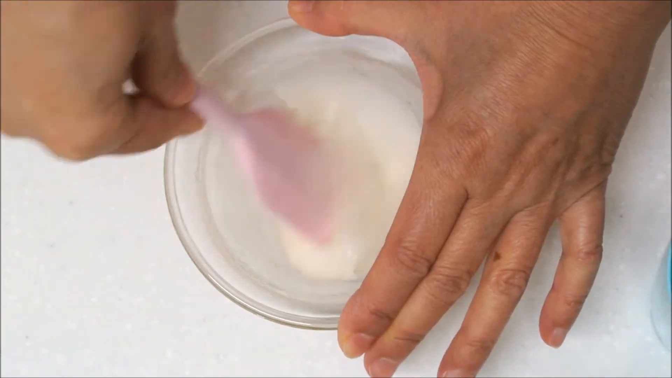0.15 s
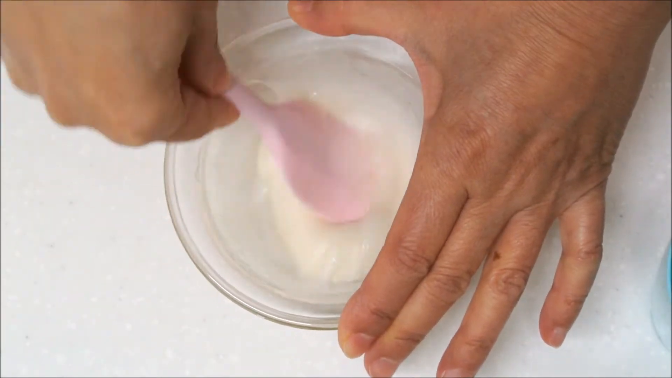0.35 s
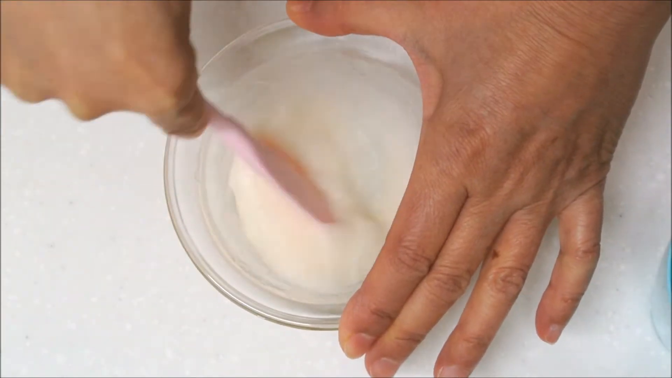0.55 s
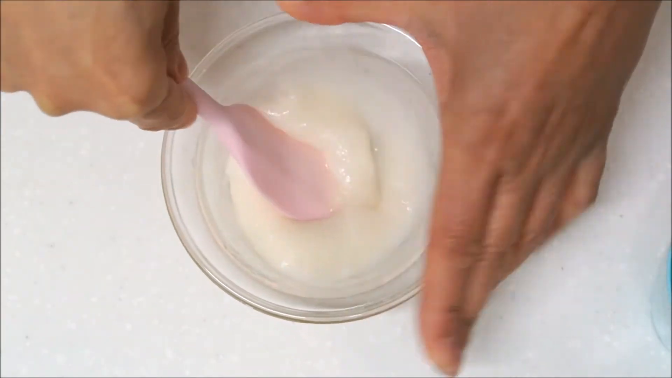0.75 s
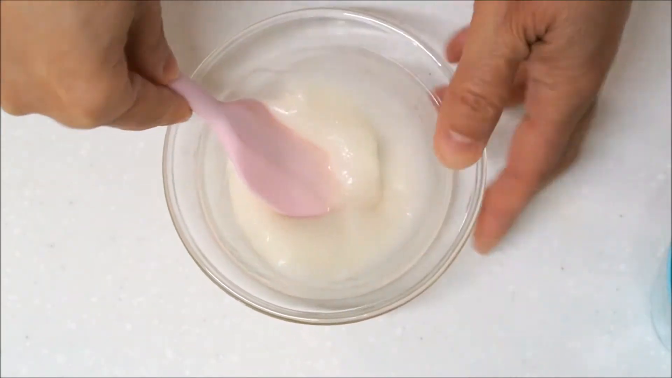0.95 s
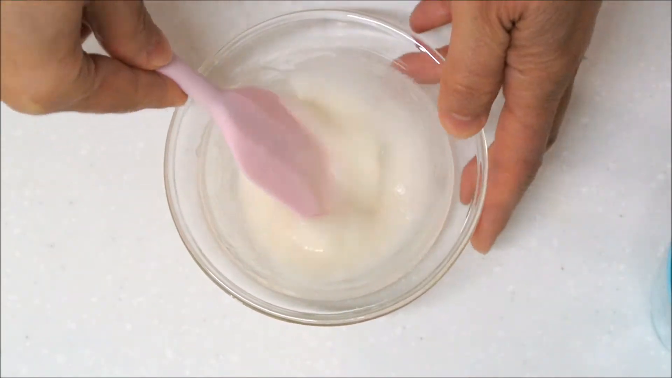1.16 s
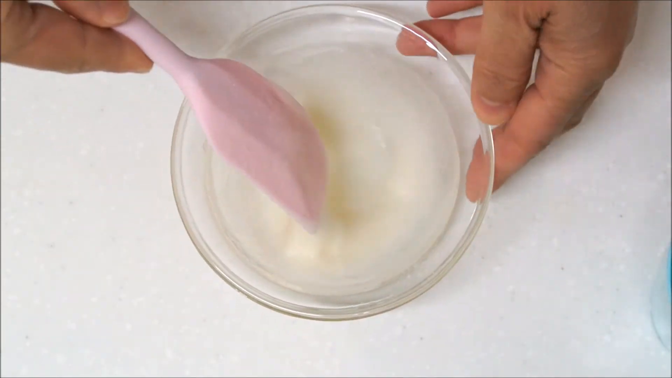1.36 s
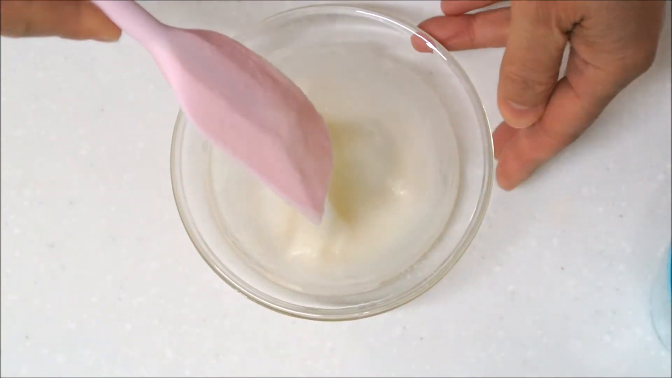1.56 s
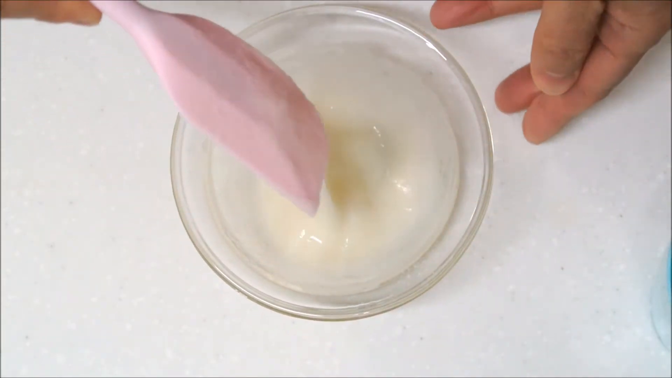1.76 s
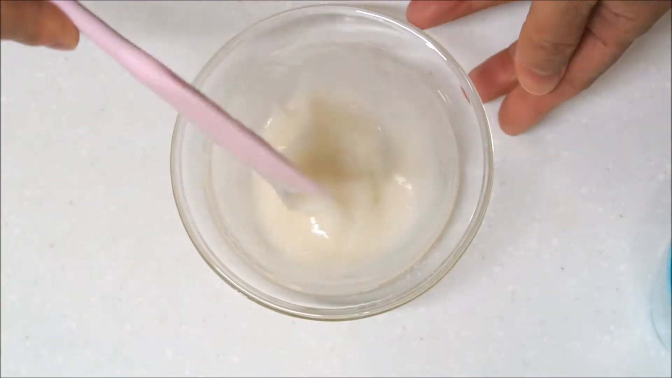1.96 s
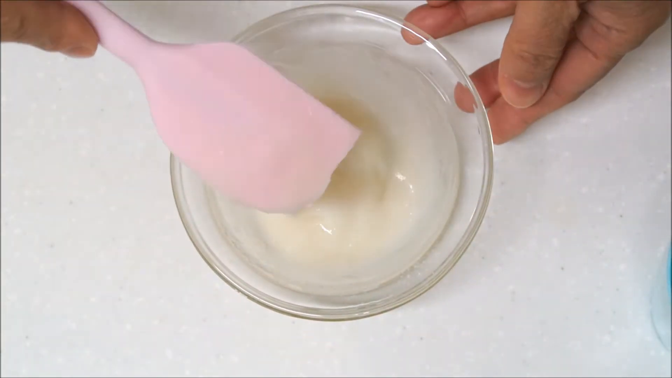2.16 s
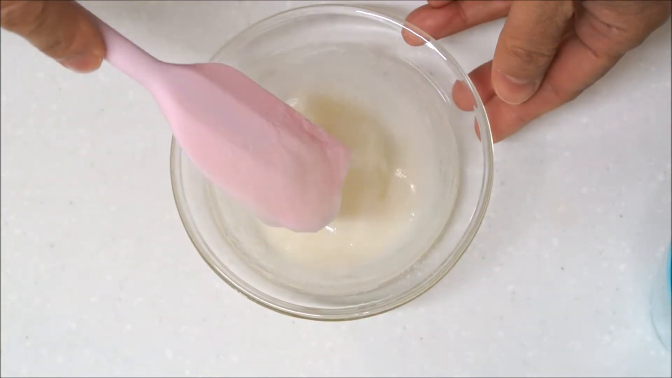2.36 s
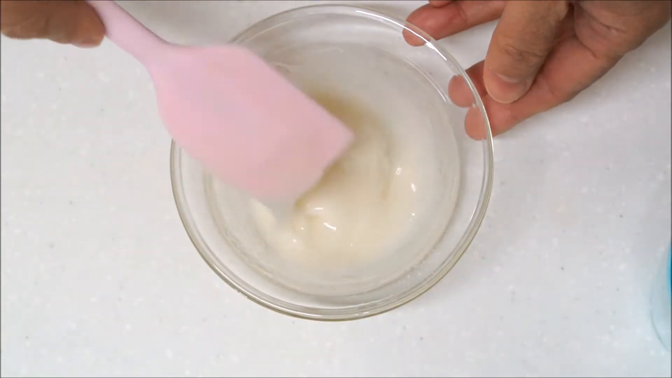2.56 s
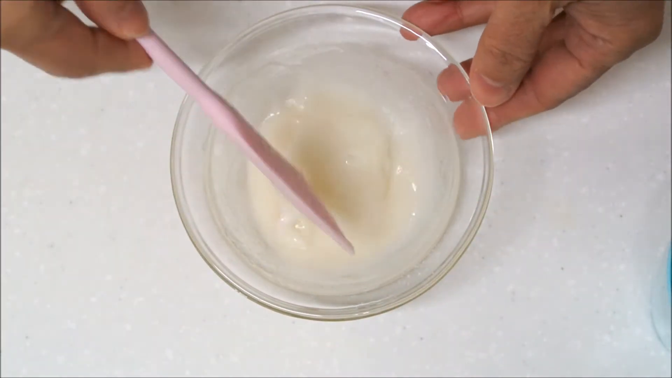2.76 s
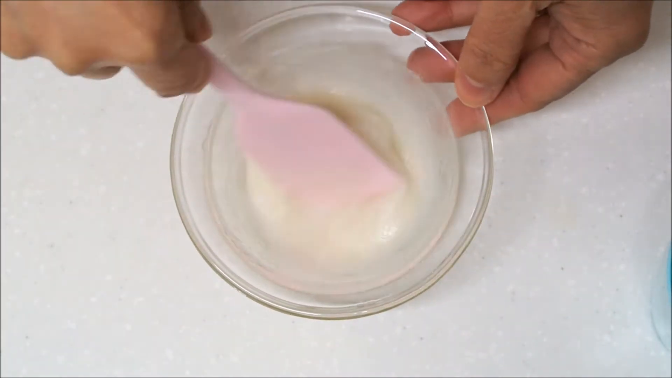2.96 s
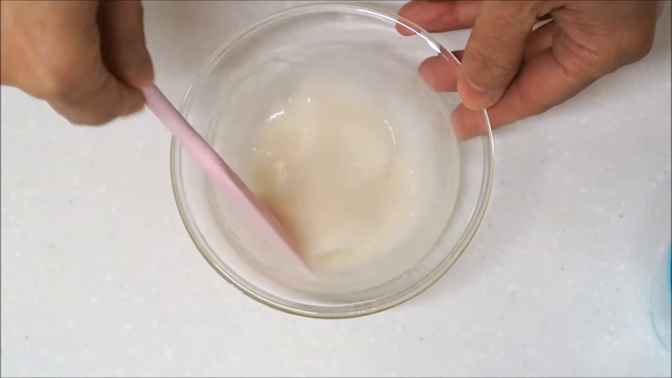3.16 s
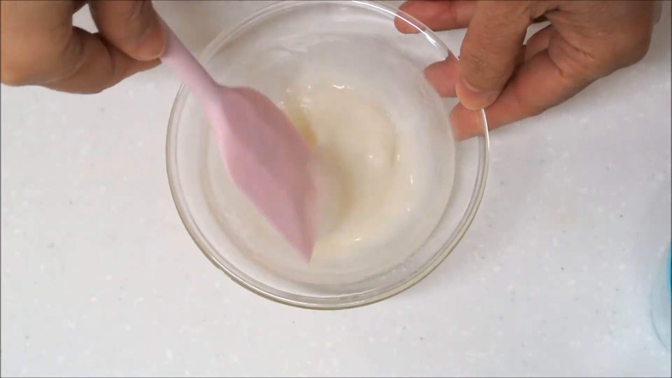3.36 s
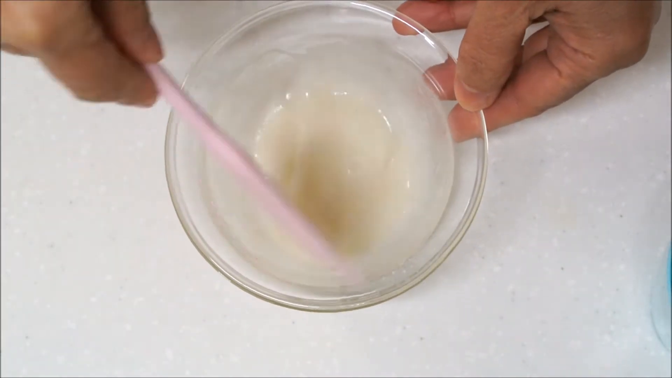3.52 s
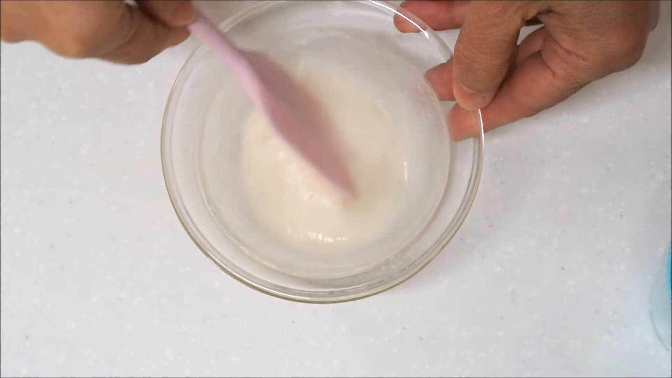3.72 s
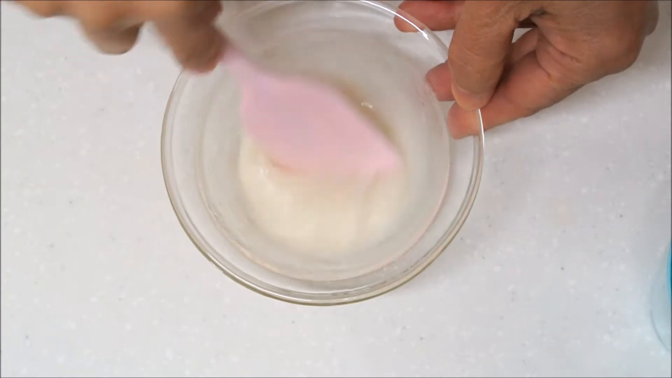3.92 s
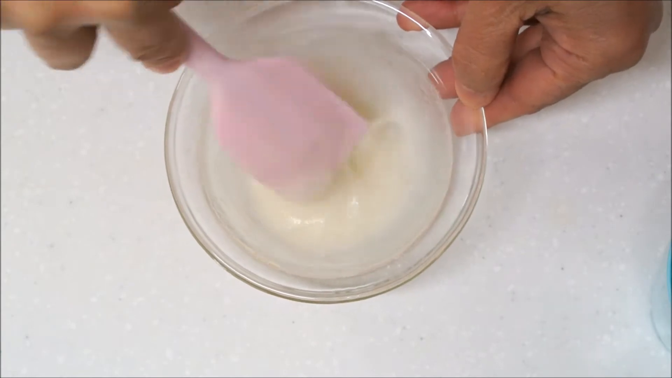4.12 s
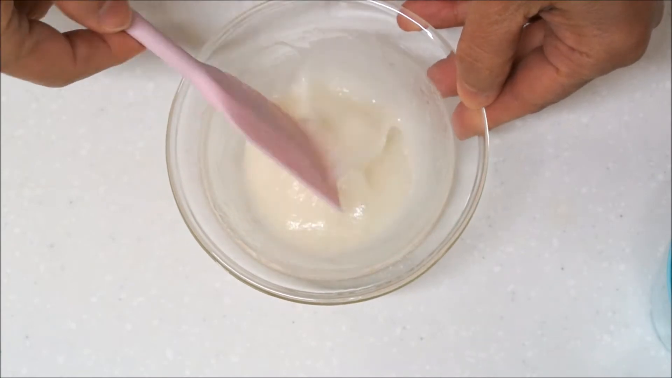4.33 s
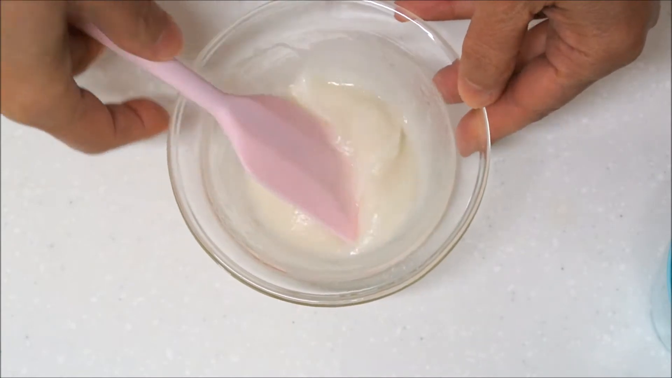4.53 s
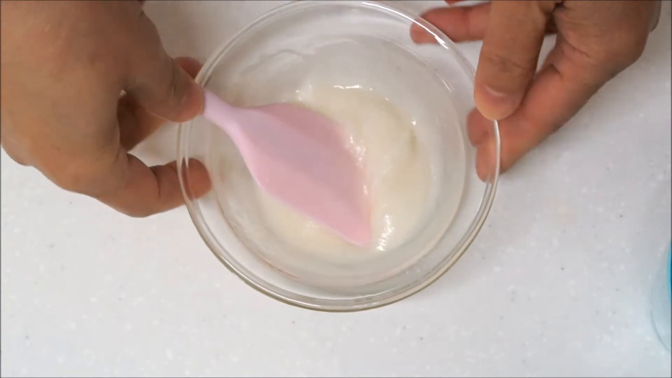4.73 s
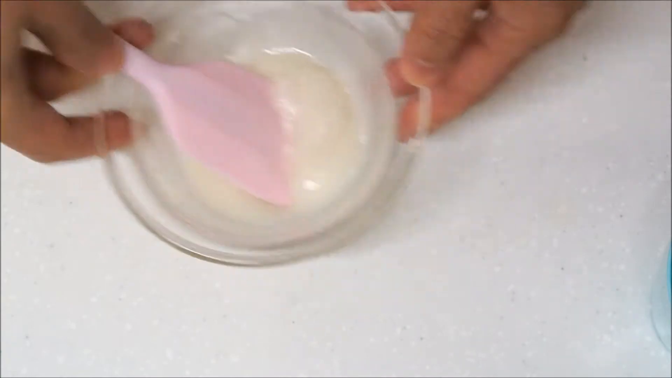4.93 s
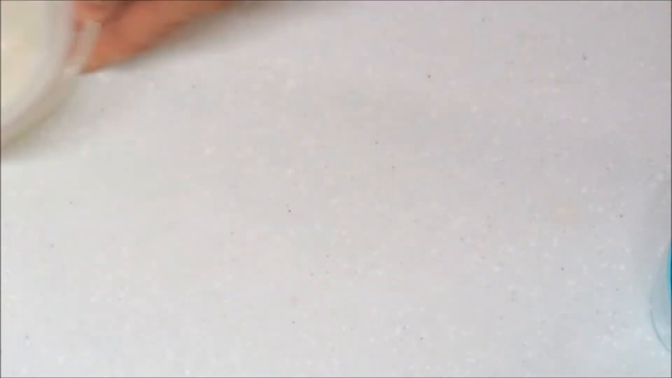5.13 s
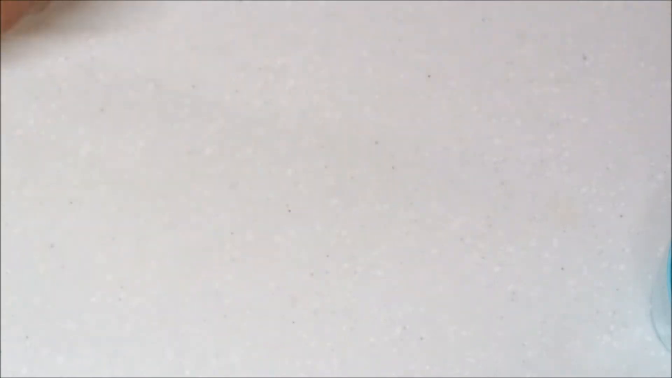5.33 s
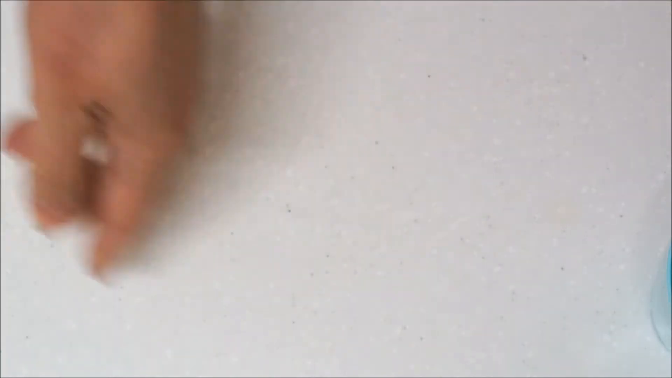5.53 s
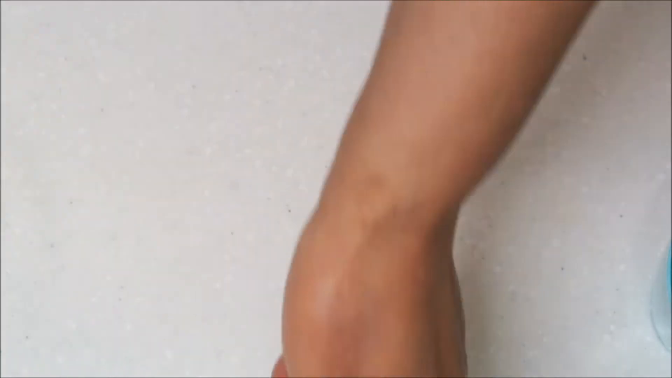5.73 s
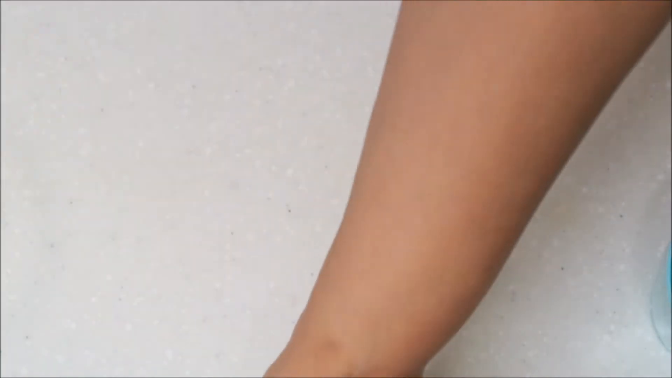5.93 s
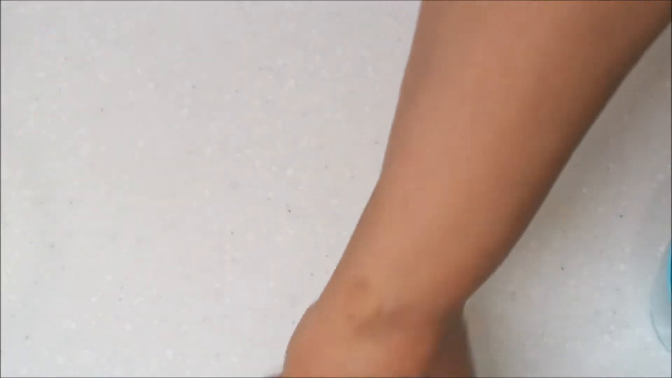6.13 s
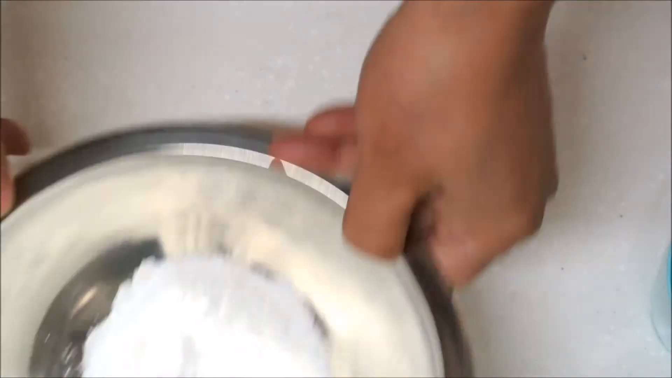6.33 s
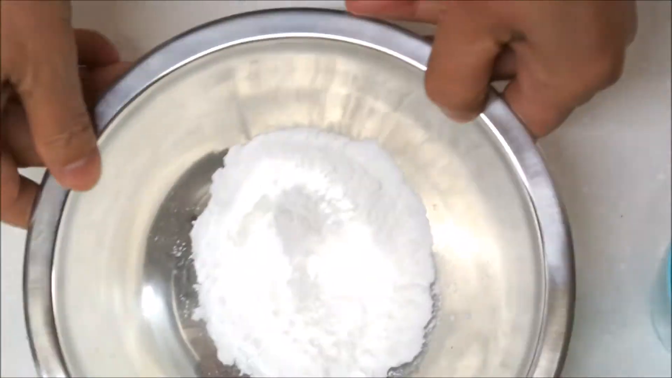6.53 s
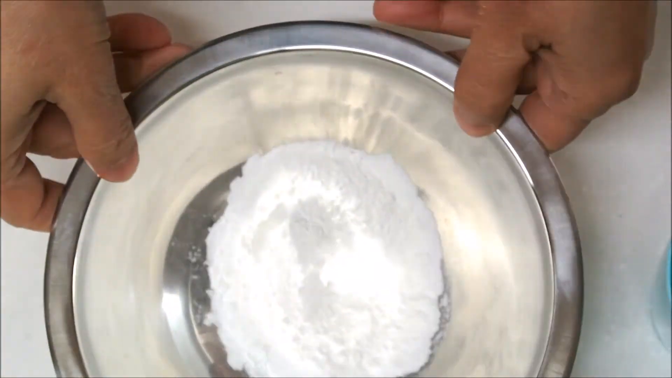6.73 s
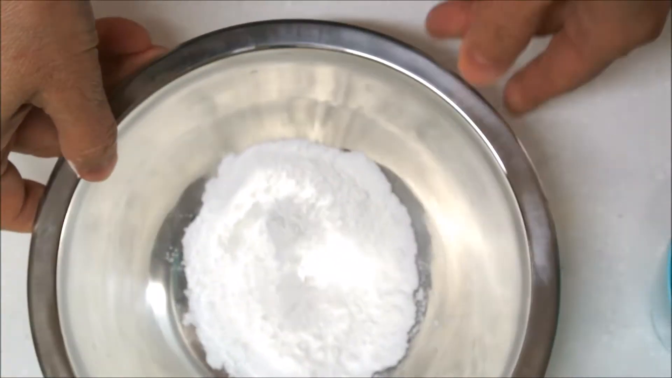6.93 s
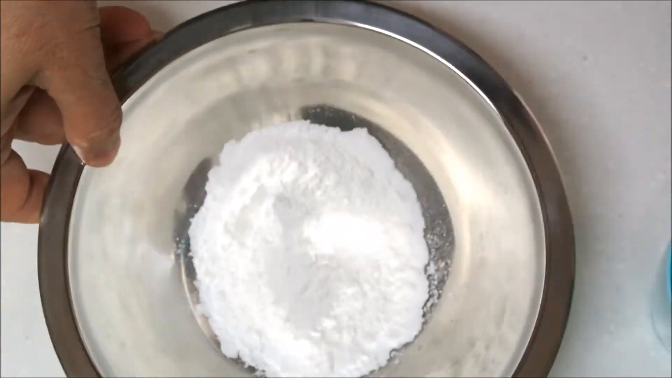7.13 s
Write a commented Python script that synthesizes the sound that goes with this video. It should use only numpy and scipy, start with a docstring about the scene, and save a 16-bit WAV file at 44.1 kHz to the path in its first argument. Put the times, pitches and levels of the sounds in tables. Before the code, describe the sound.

Close to the microphone in a small, slightly echoing kitchen, a soft spatula bumps and rubs inside a glass bowl while batter squelches faintly. The stirring comes in irregular spurts over a low fan hum. One hard knock follows as the glass is put on the counter. Then a steel bowl scrapes briefly across the surface and is set down with a ringing clank.

```python
"""A silicone spatula stirs thick batter in a glass bowl on a kitchen counter: the blade bumps the glass,
blade or fingers judder along it, and the batter squelches and ticks. The bowl is put down hard to
the left. A steel bowl of powder is gripped and slid over, rasping and squeaking, then set down ringing.
An appliance hums in the small live room, and the recorder's gain control ducks on the loud knocks."""
import sys
import numpy as np
from scipy import signal
from scipy.fft import rfft, irfft, next_fast_len
from scipy.io import wavfile
from scipy.ndimage import uniform_filter1d

SR = 44100
rng = np.random.default_rng(int(sys.argv[2]) if len(sys.argv) > 2 else 0)


def generate_wav(signal):
    """Clip the signal to [-1, 1] and save it as 16-bit WAV at the path in sys.argv[1]."""
    frames = np.transpose(np.atleast_2d(signal))
    scaled = np.clip(frames, -1, 1) * 32767
    pcm = np.round(scaled).astype(np.int16)
    wavfile.write(sys.argv[1], SR, pcm)


N = 316638
TIME = np.arange(N) / SR


def from_db(db):
    """Decibels to gain."""
    return 10 ** (np.asarray(db) / 20)


def rms_one(x):
    """Scale to rms 1."""
    return x / np.sqrt(np.mean(x ** 2) + 1e-20)


def at_hz(points, hz):
    """Read a curve on a log-frequency axis."""
    points = np.array(points)
    return np.interp(np.log(np.maximum(hz, 1)), np.log(points[:, 0]), points[:, 1])


def convolve(x, response):
    """Pass a sound through an impulse response."""
    return signal.oaconvolve(np.atleast_2d(x), np.atleast_2d(response), axes=-1)[:, :N]


def colour(x, spectrum, size=8192):
    """Minimum-phase EQ of unit energy: the curve sets the tone, not the overall level."""
    gains = from_db(at_hz(spectrum, np.fft.rfftfreq(size, 1 / SR)))
    cepstrum = irfft(np.log(gains))[:size // 2]
    cepstrum[0] /= 2
    response = irfft(np.exp(rfft(2 * cepstrum, size)))[:size // 2]
    return convolve(x, response / np.linalg.norm(response))


def resonance(x, hz, width):
    """Two-pole band-pass with gain 1 at its peak."""
    r = np.exp(-np.pi * width / SR)
    poles = [1, -2 * r * np.cos(2 * np.pi * hz / SR), r * r]
    return signal.lfilter(np.array([1, 0, -1]) * (1 - r * r) / 2, poles, x + 1e-18)


def steep_band(x, hz, width):
    """Two resonances in series, for steeper skirts."""
    return resonance(resonance(x, hz, width), hz, width)


def body(force, modes):
    """The force radiates directly as a thud and rings the modes."""
    ring = sum(from_db(db) * resonance(force, hz, np.log(1000) / np.pi / t60) for hz, db, t60 in modes)
    return force + ring


def dying(t, t60):
    """Gain that falls by 60 dB in t60 seconds."""
    return np.exp(-np.log(1000) * np.maximum(t, 0) / t60)


def blows(rows, size=2048):
    """Force pulses: the softer the contact, the lower its treble ends."""
    force = np.zeros(N + size)
    for start, db, hz in rows:
        at = round(start * SR)
        softness = signal.butter(2, min(hz, SR / 3), fs=SR, output="sos")
        force[at:at + size] += from_db(db) * signal.sosfilt(softness, signal.unit_impulse(size))
    return force[:N]


def stroke(start, rise, length, t60):
    """Pressure of one rub: it builds up, holds, then slips away; times in seconds."""
    return np.clip((TIME - start) / rise, 0, 1) * dying(TIME - start - max(length, rise), t60)


def grains(per_s, spread_db):
    """Random tiny slips of uneven size; rms 1."""
    sizes = from_db(spread_db * np.minimum(rng.exponential(1, N), 4)) * rng.choice([-1, 1], N)
    return rms_one(sizes * (rng.random(N) < per_s / SR))


# How alike diffuse sound is at the two microphones: frequency_hz, correlation
STEREO_LIKENESS = [(100, 0.78), (450, 0.85), (900, 0.62), (1500, 0.4), (2800, 0.044), (5000, 0)]

def diffuse(size):
    """White stereo noise from all sides: narrow in the bass, wide in the treble."""
    alike = np.clip(at_hz(STEREO_LIKENESS, np.fft.rfftfreq(size, 1 / SR)), -1, 1)
    mid, side = rfft(rng.standard_normal((2, size)))
    return irfft(np.sqrt((1 + alike) / 2) * mid + np.sqrt((1 - alike) / 2) * side * [[1], [-1]], size)


# Reverb time of the kitchen: frequency_hz, t60_s
ROOM_DECAY = [(120, 0.52), (400, 0.5), (1200, 0.46), (2800, 0.5), (5500, 0.42), (10000, 0.31),
              (15000, 0.098)]

def room_tail(size=32768, bands=12):
    """Reverb of unit energy; each band dies at its own rate."""
    t, hz = np.arange(size) / SR, np.fft.rfftfreq(size, 1 / SR)
    centres = np.geomspace(ROOM_DECAY[0][0], ROOM_DECAY[-1][0], bands)
    noise, tail = rfft(diffuse(size)), 0
    for centre, share in zip(centres, np.eye(bands)):
        band = irfft(noise * at_hz(np.c_[centres, share], hz))
        tail = tail + band * dying(t, at_hz(ROOM_DECAY, centre))
    return rms_one(tail * np.minimum(t / 0.0054, 1)) / np.sqrt(size)


def kitchen(x, near_db, room_db, lead_ms, near_t60=0.031, size=32768):
    """Direct sound (earlier on the left by lead_ms), reflections off counter and wall, then the room."""
    t = np.arange(size) / SR
    delay_samples = np.maximum([[-lead_ms], [lead_ms]], 0) * SR / 1000
    direct = np.sinc(np.arange(size) - delay_samples)
    near = rms_one(diffuse(size) * dying(t, near_t60) * np.minimum(t / 0.00037, 1)) / np.sqrt(size)
    return convolve(x, direct + from_db(near_db) * near + from_db(room_db) * room_tail())


# Wavering drone of the fan: pitch_hz, half_width_hz, level_db
FAN_BANDS = [(144, 17, -63.5), (252.2, 8.6, -57), (392.3, 14, -65), (514.7, 12, -65.5), (794, 35, -59.5),
             (872, 21, -62)]
# Steady hum of the motor: pitch_hz, level_db
MOTOR_TONES = [(48.5, -64), (97, -69)]

def appliance():
    """A motor hums in pure tones under the narrow noise bands of its fan."""
    air = diffuse(next_fast_len(N + SR))   # the extra second lets the bands settle
    fan = sum(from_db(db) * rms_one(steep_band(air, hz, 2 * half_width)[:, -N:])
              for hz, half_width, db in FAN_BANDS)
    motor = sum(from_db(db) * rms_one(np.sin(2 * np.pi * hz * TIME)) for hz, db in MOTOR_TONES)
    return motor + fan


# Tone of the noise bed: frequency_hz, gain_db
ROOM_TONE_EQ = [(25, -5), (45, -1), (75, -2.5), (120, -22.5), (190, -1), (400, 1.5), (850, -4.5),
                (1200, -6.5), (2000, -9.5), (5000, -13), (11000, -14), (15500, -17)]

def room_tone():
    """A steady bed of room noise and microphone hiss."""
    return from_db(-48) * colour(diffuse(next_fast_len(N)), ROOM_TONE_EQ)


# Rubs along the glass, by spatula or fingers: start_s, length_s, level_db, squelch_hz
GLASS_RUBS = [(0.119, 0.056, -54.5, 4500), (0.383, 0.027, -41, 4030), (0.403, 0.07, -49, 3860),
              (0.622, 0.044, -41.5, 8700), (3.237, 0.028, -49.5, 11500), (3.707, 0.0055, -43, 11800)]
# Tone of a rub on the glass: frequency_hz, gain_db
SCRAPE_EQ = [(200, 3.5), (1200, -4), (1700, 2), (2100, -2.5), (2700, -0.5), (3200, -8), (3900, -2),
             (5800, -10), (7200, -0.5), (9500, -11.5), (15000, -6)]

def glass_friction(judder_s=0.031, judder_db=10.5, squelch_db_per_octave=5):
    """Spatula or fingers stick and slip on the glass; the batter squelches and ticks as it parts."""
    slips, bursts = grains(per_s=6000, spread_db=1.1), grains(per_s=9000, spread_db=9.3)
    pressure, wet = 0, batter_ticks()
    for start, length, db, hz in GLASS_RUBS:
        judder = from_db(-judder_db * ((TIME - start) / judder_s % 1))   # catch, ease off, catch again
        press = from_db(db) * judder * stroke(start, rise=0.0056, length=length, t60=0.034)
        pressure = pressure + press
        # a thinner film of batter squelches higher and louder
        squelch_db = -1 + squelch_db_per_octave * np.log2(hz / 8000)
        wet = wet + from_db(squelch_db) * press * rms_one(steep_band(bursts, hz, 0.62 * hz))
    scrape = colour(pressure * slips, SCRAPE_EQ)
    return from_db(2.5) * kitchen(scrape + wet, near_db=0.5, room_db=-5.5, lead_ms=0.0061)


# Spatula hits on the glass: start_s, level_db, brightness_hz
SPATULA_HITS = [(.384, -8.5, 152), (.919, -17.5, 1010), (1.092, -20.5, 1410), (1.194, -17, 1010),
                (3.233, -12, 130), (3.7143, -10.5, 1900), (4.407, -13.5, 230), (4.638, -22, 1200),
                (4.773, -17.5, 1160), (4.801, -21, 850), (5.612, -27, 8800)]
# Thud of soft silicone on glass: frequency_hz, gain_db
SPATULA_EQ = [(40, -7), (100, -3), (200, -1.5), (500, -3), (850, 0.5), (1300, -2.5), (1600, 2), (2100, -6),
              (3300, 0.5), (6000, -7.5), (15000, -21)]
# Ring of the glass bowl, choked by batter: pitch_hz, over_thud_db, t60_s
GLASS_RING = [(528, -4, 0.052), (901, 2, 0.022), (1270, -6.5, 0.026), (1680, -27, 0.02),
              (1916, -3.5, 0.029), (2225, -7, 0.0095), (2470, -27, 0.03), (4620, 3, .08), (6700, 2, 0.11)]

def spatula_taps(follow_s=0.00381, follow_db=2.5, follow_brightness=0.22):
    """The soft blade taps the bowl close by and follows through each time with a duller bump."""
    bumps = [(start + follow_s, db + follow_db, hz * follow_brightness) for start, db, hz in SPATULA_HITS]
    thud = colour(blows(SPATULA_HITS) + blows(bumps), SPATULA_EQ)
    taps = body(thud, GLASS_RING)
    return from_db(4) * kitchen(taps, near_db=6.5, room_db=-0.5, lead_ms=0.018, near_t60=0.052)


# The clear ticks of the batter: start_s, level_db, pitch_hz
BATTER_TICKS = [(0.4888, -29, 10000), (.511, -24.5, 8540), (0.674, -21, 10000), (.712, -23, 7600),
                (1.14, -29.5, 5100), (1.62, -28, 10000), (3.237, -30, 4500), (3.996, -22.5, 11000)]

def batter_ticks(faint_count=10, faint_db=-35.5, scatter_s=6.9, attack_s=0.00025, size=1024):
    """Batter lets go of the blade in tiny wet pops: a few clear ones and a random scatter of faint ones."""
    t, wet = np.arange(size) / SR, np.zeros(N + size)
    burst = np.minimum(t / attack_s, 1) * dying(t - attack_s, t60=0.0023)
    faint = [(scatter_s * when, faint_db, 8000 * 2 ** (pitch - 0.5))
             for when, pitch in rng.random((faint_count, 2))]
    film = rng.standard_normal(N + size)
    for start, db, hz in list(BATTER_TICKS) + faint:
        at = round(start * SR)
        pop = resonance(film[at:at + size] * burst, hz, width=hz)
        wet[at:at + size] += from_db(db) * pop / np.linalg.norm(pop)
    return wet[:N]


# The glass bowl hits the counter: start_s, level_db, brightness_hz
LANDING_HIT = [(5.2734, 24, 6060)]
# Knock of glass on the hard counter: frequency_hz, gain_db
LANDING_EQ = [(40, -25), (140, -12), (260, -4), (600, -1.5), (1200, 1), (2000, 0.5), (2800, 0.5),
              (4000, -8), (7000, -12), (15000, 0)]
# Clack of the counter top under the glass foot: pitch_hz, width_hz, gain_db
COUNTER_CLACK = [(1320, 71, 20.5), (1610, 64, -1.5), (1930, 225, 13.5)]

def glass_landing():
    """The bowl lands hard to the left, and the clack of the counter beams at the microphones."""
    force = blows(LANDING_HIT)
    knock = body(colour(force, LANDING_EQ), GLASS_RING)
    clack = sum(from_db(db) * resonance(force, hz, width) for hz, width, db in COUNTER_CLACK)
    knock = kitchen(knock, near_db=4, room_db=3.5, lead_ms=0.027, near_t60=0.03)
    clack = kitchen(clack, near_db=4.5, room_db=-12, lead_ms=0.17)
    return knock + from_db(-3) * clack


def wall_tone(slips, hz):
    """Friction catches on one resonance of the steel wall; rms 1."""
    return rms_one(steep_band(slips, hz, width=400 + 0.12 * hz))


# Skin and counter rub the steel: start_s, length_s, rasp_db, squeak_db, squeak_hz
STEEL_STROKES = [(6.026, 0.046, -48.5, -62, 7350), (6.081, 0.014, -48.5, -48, 9700),
                 (6.104, .042, -38.5, -51, 9700), (6.37, 0.026, -39, -44.5, 7350),
                 (6.402, 0.19, -51.5, -62, 7900), (6.846, 0.019, -50, -51.5, 7260)]
# Tone of the rasp on steel: frequency_hz, gain_db
RASP_EQ = [(150, -3), (600, 0.5), (1400, 2), (2000, 3), (3000, 1.5), (4800, -1.5), (7000, 3.5), (10000, 9),
           (12000, 3.5), (15500, -7)]
# Wall resonances that a scuff catches on: pitch_hz, over_rasp_db
SCUFF_RING = [(2620, -20), (3950, -17), (9450, -9)]

def steel_friction(scuff_db_per_hit_db=1.51, firm_rasp_db=-38, groan_db_per_rasp_db=3.1):
    """Each knock scuffs the steel foot over the counter; rubs rasp and squeak, and firm ones groan."""
    slips = grains(per_s=8300, spread_db=2.4)
    pressure = 0
    for start, db, _ in STEEL_HITS:
        scuff_db = -37.5 + scuff_db_per_hit_db * db
        pressure = pressure + from_db(scuff_db) * stroke(start, rise=0.00042, length=0, t60=0.017)
    tones = pressure * sum(from_db(db) * wall_tone(slips, hz) for hz, db in SCUFF_RING)
    groan = wall_tone(slips, hz=1280)
    for start, length, rasp_db, squeak_db, squeak_hz in STEEL_STROKES:
        press = stroke(start, rise=0.0075, length=length, t60=0.13)
        pressure = pressure + from_db(rasp_db) * press
        squeak = from_db(squeak_db) * wall_tone(slips, squeak_hz)
        groan_db = -44 + groan_db_per_rasp_db * (rasp_db - firm_rasp_db)
        tones = tones + press * (squeak + from_db(groan_db) * groan)
    rasp = colour(pressure * slips, RASP_EQ)
    return from_db(-3) * kitchen(rasp + tones, near_db=-0.5, room_db=-4.5, lead_ms=-0.016, near_t60=0.027)


# Hits on the steel bowl: start_s, level_db, brightness_hz
STEEL_HITS = [(6.064, 2, 420), (6.9352, 12.5, 2190), (6.963, 2, 2500)]
# Thud of the steel bowl: frequency_hz, gain_db
STEEL_EQ = [(50, -45), (110, -11.5), (200, -4), (450, -4), (900, 0.5), (1200, -18), (1600, -12.5),
            (1900, -28.5), (3000, -26.5), (8000, -10), (15000, -10.5)]
# Ring of the thin steel, damped by the hands: pitch_hz, over_thud_db, t60_s
STEEL_RING = [(177, 0.5, 0.59), (390, -2, 0.34), (685, -4, 0.52), (1160, -3, 0.23), (1359, 19.5, 0.093),
              (1340, 3, 0.25), (1468, 5, 0.082), (1566, 11, 0.18), (2170, 16.5, 0.024), (2470, 5, 0.22),
              (2580, 0, .1), (3880, -9, 0.11), (6200, -10, .1), (8850, -2, .05)]

def steel_knocks():
    """The steel bowl rings as it is gripped, then lands on the counter and rocks once."""
    knocks = body(colour(blows(STEEL_HITS), STEEL_EQ), STEEL_RING)
    return from_db(1.5) * kitchen(knocks, near_db=-3, room_db=-6.5, lead_ms=-0.018, near_t60=0.11)


def scene():
    """The two bowls over the kitchen ambience, in stereo."""
    glass = spatula_taps() + glass_landing() + glass_friction()
    steel = steel_friction() + steel_knocks()
    return glass + steel + appliance() + room_tone()


def gain_control(x, threshold_db=-9, release_db_per_s=90, attack_s=0.013, ahead_s=0.00025):
    """The gain ducks within milliseconds of a loud sound, starting just ahead of it, and creeps back."""
    power = uniform_filter1d(np.mean(x ** 2, axis=0), size=88)
    level_db = 10 * np.log10(np.maximum(power, 1e-12))
    over_db = np.maximum(np.interp(TIME + ahead_s, TIME, level_db) - threshold_db, 0)
    held_db = np.maximum.accumulate(over_db + release_db_per_s * TIME) - release_db_per_s * TIME
    r = np.exp(-1 / (attack_s * SR))
    return x * from_db(-signal.lfilter([1 - r], [1, -r], held_db))


def record(dry):
    """The right microphone is fuller below the treble; ducking, clipping and band limits follow."""
    lows = signal.sosfilt(signal.butter(1, 4000, fs=SR, output="sos"), dry)
    tilt = (0.13 * lows - 0.039 * dry) * [[-1], [1]]
    clipped = np.clip(gain_control(dry + tilt), -0.88, 0.88)
    low_cut = signal.butter(2, 52, "high", fs=SR, output="sos")
    high_cut = signal.cheby2(24, 70, 16478, fs=SR, output="sos")
    return signal.sosfilt(high_cut, signal.sosfilt(low_cut, clipped))


dry = scene()
out = record(dry)
generate_wav(out)
```